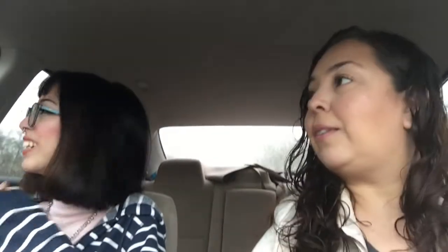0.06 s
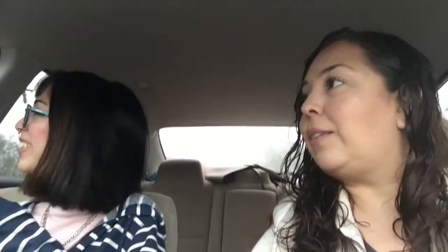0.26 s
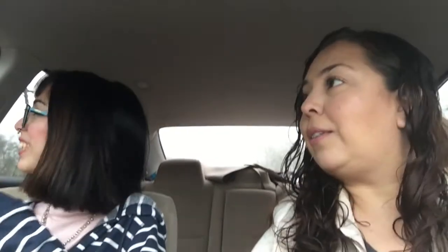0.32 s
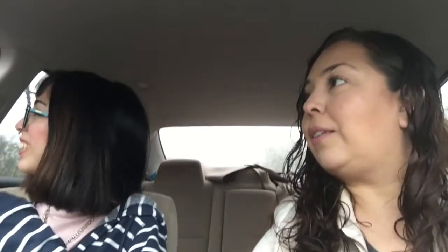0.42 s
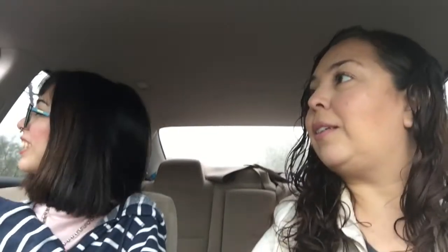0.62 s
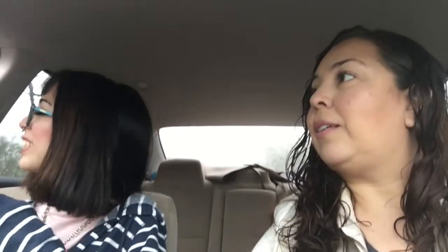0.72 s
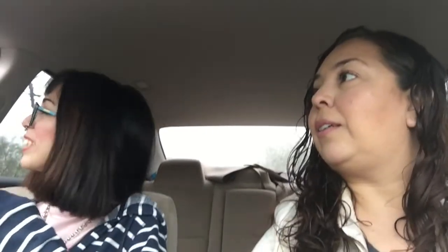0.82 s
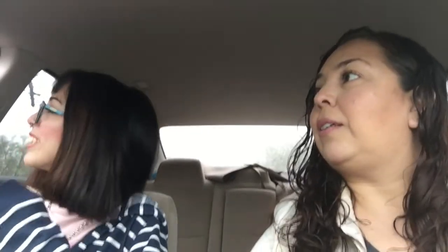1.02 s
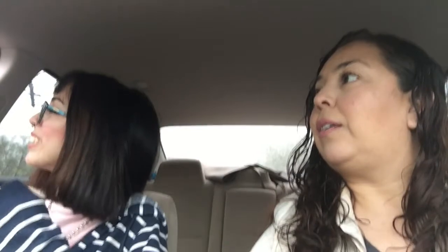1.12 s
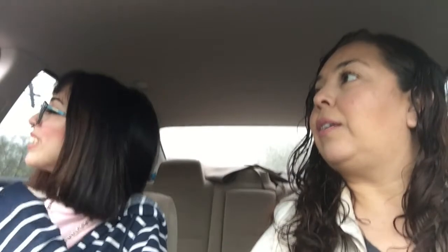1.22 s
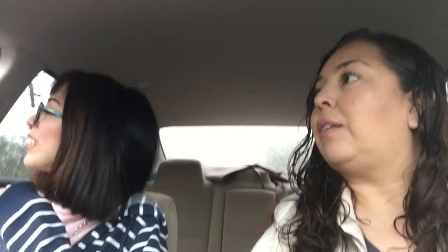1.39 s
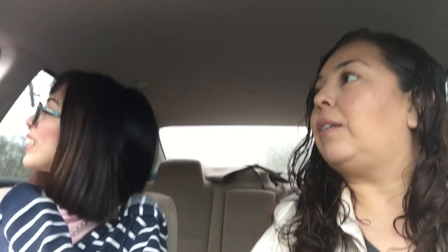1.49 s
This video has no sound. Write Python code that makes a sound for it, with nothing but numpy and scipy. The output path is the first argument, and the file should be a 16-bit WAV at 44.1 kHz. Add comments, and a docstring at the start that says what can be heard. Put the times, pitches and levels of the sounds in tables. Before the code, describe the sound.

Electric car window: after a brief quiet engine rumble, a rattly plastic clack and low thumps, then a thin motor whine with gear noise and rubbing glass, with a few later clicks; small muffled cabin, one nearby microphone.

```python
"""A parked car idles with the cabin shut: wavering firing orders, low lumps, faint injector ticks and a
noise floor. A door switch clacks, a rattle of contacts exciting trim modes, and the window motor pulls
the glass out of its seal: thuds and rough noise shudder the door panel as the rubbing hiss sets in.
Then the motor whines at ten times its rotor speed, a sum of rotor orders, over the hiss of gears
and of glass in its guides, both noise; a few later clacks follow."""
import sys
import numpy as np
from scipy import signal
from scipy.io import wavfile

SR = 44100
rng = np.random.default_rng(int(sys.argv[2]) if len(sys.argv) > 2 else 0)


def materialize(psi):
    """Save the field psi as 16-bit PCM at rate SR to the path in sys.argv[1].

    A 1-D psi becomes a single channel; in a 2-D psi each row is a channel.
    """
    bounded = np.clip(np.atleast_2d(psi).T, -1, 1)
    quanta = np.round(bounded * 32767).astype(np.int16)
    wavfile.write(sys.argv[1], SR, quanta)


def gain_from_db(level_db):
    """Turn a decibel level (scalar or array-like) into a linear amplitude factor."""
    decades = np.asarray(level_db, float) / 20
    return 10 ** decades


N = 68355
T = np.arange(N) / SR   # time [s]

# Engine firing orders: (multiple of firing rate [1], level against the hum [dB], waver [dB])
FIRING_ORDERS = [(1, 0.5, 3.6), (1.5, -15.5, 3.3), (2, -16, 1.3)]
# Swell and sag of the idle hum: (time [s], level [dB])
IDLE_LEVEL = [(0, -48.5), (.05, -56), (.13, -57), (.2, -47), (.4, -67), (.5, -51), (.7, -50.5), (.93, -54),
              (1.02, -55), (1.38, -54.5), (1.48, -51.5), (1.55, -47.5)]
# Resonances rung by the injector ticks: (frequency [Hz])
TICK_MODES = [6460, 8500, 10950, 13300]
# Spectrum of the cabin noise floor: (frequency [Hz], relative density [dB per Hz])
CABIN_SPECTRUM = [(15, -37), (25, -45), (37, -5.5), (93, -8), (126, -2.5), (140, -25), (173, -28.5),
                  (433, -23), (648, -24.5), (703, -34.5), (14300, -55.5), (15500, -69)]
# Clacks of switch, linkage and glass:
# (time [s], level [dB], rattle length [s], centre [Hz], mode loss one octave off centre [dB])
CLACKS = [(0.14, -74, 0.0074, 730, 12), (0.162, -52, 0.015, 2000, 28), (0.189, -44, 0.0024, 2180, 8),
          (0.199, -35, 0.0052, 1840, 16), (0.2302, -28, 0.0066, 3150, 7), (0.2615, -31, 0.0014, 1330, 8),
          (0.2651, -18.5, 0.0075, 2030, 2.5), (0.274, -52, 0.007, 1300, 9), (0.329, -35, 0.014, 790, 9),
          (0.629, -33.5, 0.0024, 740, 4), (0.632, -33.5, .006, 550, 1), (1.121, -35, 0.0058, 351.2, 6)]
# Modes of the door trim: (frequency [Hz])
TRIM_MODES = [335, 575, 812, 1140, 1300, 1437, 1678, 2090, 2455, 2980, 3915, 4230, 6200, 6550, 7900, 8350,
              10500]
# Ring of each trim mode: (relative level [dB], T60 [s])
TRIM_RINGS = [(-3, 0.043), (-3.5, 0.013), (-14.5, 0.051), (2, 0.044), (-1, 0.017), (-8.5, 0.016),
              (-2, 0.018), (2.5, 0.01), (-8, 0.034), (-13, 0.028), (-4.5, 0.012), (-2.5, .018),
              (-3.5, 0.017), (-8.5, 0.014), (-2.5, 0.018), (-7.5, 0.014), (-16, 0.012)]
# Low thumps, first lumps of the idle, then door panel thuds as the glass frees:
# (time [s], level [dB], centre [Hz])
THUMPS = [(0.013, -48.5, 98), (.098, -45.5, 95), (.143, -40.5, 99), (.186, -44, 88.4), (.208, -26.5, 126),
          (.232, -30.5, 166), (0.243, -31.5, 145), (0.263, -24.5, 282), (.278, -40, 79),
          (0.286, -35.5, 223), (0.317, -33, 75), (0.351, -34.5, 109), (.366, -31, 95), (.377, -30, 76),
          (0.438, -38, 96)]
# Low modes rung by the thumps: (frequency [Hz], damping rate [Hz], relative level [dB])
LOW_MODES = [(71.6, 26.7, 8), (95, 16.5, 0.5), (138.6, 28, 1), (165, 33, -2), (223, 27, -6), (356, 36, -3),
             (480, 90, -8)]
# Rough shudder of the door panel: (time [s], level [dB])
SHUDDER = [(0.17, -78), (0.202, -42.5), (0.24, -48), (0.268, -38), (0.318, -64), (0.34, -45.5),
           (0.432, -57.5), (0.456, -55.5), (0.472, -66), (0.548, -71), (0.56, -69)]
# Motor whine: (time [s], frequency [Hz], level [dB])
WHINE = [(.44, 1315, -56), (.5, 1319, -63.5), (.57, 1325, -58.5), (.62, 1310, -50.5), (.655, 1277, -69.5),
         (.69, 1249, -49), (.72, 1281, -58.5), (.755, 1240, -59.5), (.8, 1213, -55.5), (.9, 1177, -58.5),
         (1.02, 1130, -54.5), (1.04, 1100, -56), (1.12, 1098, -56), (1.2, 1092, -60.5), (1.27, 1075, -58.5),
         (1.44, 1082, -58.5), (1.55, 1110, -58.5)]
# Rotor orders beside the whine: (multiple of rotor speed [1], level against the whine [dB])
SIDE_ORDERS = [(5, -30), (7, -24.5), (8, -32), (9, -19), (11, -18.5), (12, -23), (13, -33), (19, -18),
               (20, -21), (24, -15), (30, -26)]
# Resonances of motor housing and door: (frequency [Hz], width [Hz], relative level [dB])
HOUSING_MODES = [(673.4, 20.4, -3), (909, 30, -8), (1830, 59, 1), (1950, 74, -3.5), (2146, 150, -3.5),
                 (2600, 29, -6.5), (2960, 340, -11), (3370, 82, -2), (3900, 220, -9), (6370, 400, -15.5),
                 (7830, 250, -22)]
# Glass in its guides: (time [s], hiss level [dB], brightness [dB per octave above 3.5 kHz])
GLIDE = [(.16, -114, 5), (.19, -76, -12), (.22, -42.5, -22), (.255, -56.5, 5.5), (.285, -73, 12),
         (.295, -53.5, 0), (.318, -43.5, -6.5), (.345, -51.5, 4), (.36, -53.5, 2), (.38, -49, -2),
         (.41, -54.5, -4), (.5, -52.5, 1), (.6, -55, 1), (.8, -54.5, 2.5), (1.0, -56.5, 5),
         (1.19, -55.5, 5), (1.35, -58, 3.5), (1.55, -57, 5.5)]
# Spectrum of the rubbing hiss: (frequency [Hz], relative density [dB per Hz])
HISS_SPECTRUM = [(90, -22), (130, -7), (170, -8), (350, -2.5), (480, -17), (640, -17.5), (780, -29),
                 (1000, -21.5), (1400, -9), (1750, -8.5), (2700, -8), (3400, -8.5), (5000, -17.5),
                 (6300, -16.5), (8000, -19.5), (11000, -35), (15500, -46)]


def rms_one(x):
    """Power normalisation: the root mean square becomes 1."""
    return x / np.sqrt(np.mean(x ** 2) + 1e-20)


def peak_one(x):
    """Amplitude normalisation: the greatest magnitude becomes 1."""
    return x / (np.max(np.abs(x)) + 1e-20)


def in_time(rows):
    """Linear interpolation: the columns of a table joined by straight lines in time."""
    s, *columns = np.transpose(rows)
    return [np.interp(T, s, column) for column in columns]


def drift(rate_hz):
    """Low-pass random process: two equal real poles at rate_hz leave a slow wander of spread 1."""
    step = 40   # samples between the points of the wander
    r = np.exp(-2 * np.pi * rate_hz * step / SR)
    white = rng.standard_normal(N // step + 2002)
    slow = signal.lfilter([1], [1, -2 * r, r * r], white)[2000:]   # settled part
    return np.interp(np.arange(N) / step, np.arange(len(slow)), rms_one(slow - slow.mean()))


def resonate(x, hz, width_hz):
    """Driven resonance: a pole pair passes a band around hz with gain 1 on top."""
    r = np.exp(-np.pi * width_hz / SR)
    poles = [1, -2 * r * np.cos(2 * np.pi * hz / SR), r * r]
    return signal.lfilter([(1 - r * r) / 2, 0, (r * r - 1) / 2], poles, x)


def ring(clicks, hz, t60):
    """Free decay: each unit click starts a damped sine whose envelope begins at 1."""
    r = 10 ** (-3 / (t60 * SR))
    w = 2 * np.pi * hz / SR
    return signal.lfilter([0, np.sin(w)], [1, -2 * r * np.cos(w), r * r], clicks + 1e-18)


def banded_noise(spectrum, patchy_db, bright_db=0, air_db=0):
    """Subtractive synthesis: flickering third-octave noise bands, rms 1 before brightness and air."""
    edges = 24 * 2 ** np.arange(0, 9.5, 1 / 3)   # [Hz]
    white = rng.standard_normal((2, N + 8000))
    hz_points, db_points = np.transpose(spectrum)
    out, power = 0, 0
    for k, (low, high) in enumerate(zip(edges, edges[1:])):
        band_pass = signal.butter(3, [low, high], "band", fs=SR, output="sos")
        band = signal.sosfilt(band_pass, white[k % 2])[8000:]
        hz = np.sqrt(low * high)
        level_db = np.interp(np.log(hz), np.log(hz_points), db_points)
        flicker_db = patchy_db * (1 + 1.2 * (hz < 600)) * drift(10.8)   # deeper in the bass
        band = band * gain_from_db(level_db + flicker_db)
        power = power + np.mean(band ** 2)
        tilt_db = bright_db * np.clip(np.log2(hz / 3500), 0, 1.5)
        out = out + band * gain_from_db(tilt_db + air_db * (hz > 9500))
    return out / np.sqrt(power)


def cabin(x, wet_db):
    """Reverberation: reflections in the upholstered cabin act as exponentially decaying noise."""
    t60 = 0.12   # [s]
    age = np.arange(int(.15 * SR)) / SR
    tail = rng.standard_normal(len(age)) * 10 ** (-3 * age / t60) * (age > .003)
    tail = tail / np.sqrt(np.sum(tail ** 2))
    return x + gain_from_db(wet_db) * signal.fftconvolve(x, tail)[:N]


def cabin_floor():
    """Stationary noise: the cabin floor is shaped by its spectral density."""
    return gain_from_db(-58) * banded_noise(CABIN_SPECTRUM, patchy_db=1.0)


def engine_hum(firing_hz):
    """Periodic excitation: wavering sines at multiples of a slightly wandering firing rate."""
    phase = 2 * np.pi * np.cumsum(firing_hz + 1.37 * drift(3.9)) / SR
    orders = 0
    for k, db, waver_db in FIRING_ORDERS:
        level = gain_from_db(db + waver_db * drift(15))
        orders = orders + level * np.sqrt(2) * np.sin(k * phase + rng.uniform(0, 7.2))
    hum_db, = in_time(IDLE_LEVEL)
    return gain_from_db(hum_db) * orders


def injector_ticks(firing_hz):
    """Impulse response: a click once per two nominal firing periods rings high resonances."""
    clicks = np.zeros(N)
    s = np.arange(.0425, T[-1], 2 / firing_hz)
    clicks[(s * SR).astype(int)] = gain_from_db(-75.5)
    return sum(ring(clicks, hz, t60=0.017) for hz in TICK_MODES)


def engine():
    """Superposition: firing hum plus injector ticks, both tied to one nominal rate."""
    firing_hz = 45.94
    return engine_hum(firing_hz) + injector_ticks(firing_hz)


def contact_rattle(length):
    """Random point process: contacts of either sign die away under a Gaussian; energy is 1."""
    contacts_per_s = 2500
    draw = rng.random((3, 2000))
    age = np.arange(2000) / SR
    hits = (draw[0] < contacts_per_s / SR) * np.sign(draw[1] - .5) * (0.13 + draw[2])
    hits[0] = .5   # there is always a first contact
    hits = hits * np.exp(-(age / length) ** 2)
    return np.concatenate([hits / np.sqrt(np.sum(hits ** 2)), np.zeros(SR // 10)])


def clacks():
    """Impact excitation: each rattle of contacts gives a broad snap and rings the trim's modes."""
    out = np.zeros(N)
    for s, db, length, centre_hz, focus_db in CLACKS:
        force = contact_rattle(length)
        modes = 0
        for hz, (mode_db, t60) in zip(TRIM_MODES, TRIM_RINGS):
            loss_db = focus_db * np.log2(hz / centre_hz) ** 2
            modes = modes + gain_from_db(mode_db - loss_db) * peak_one(ring(force, hz, t60))
        focus = max(focus_db, 1)
        snap = force
        for _ in range(3):
            snap = resonate(snap, centre_hz, centre_hz * 4.3 / focus)
        sound = gain_from_db(db) * (gain_from_db(-8) * modes + gain_from_db(13.5) * snap)
        # a more sharply focused contact is also duller
        cut_hz = np.clip(centre_hz * 14.4 / focus, 0.75 * centre_hz, 11000)
        sound = signal.sosfilt(signal.butter(2, cut_hz, fs=SR, output="sos"), sound)
        i = int(s * SR)
        out[i:i + len(sound)] += sound[:N - i]
    return out


def low_thumps():
    """Modal excitation: each idle lump or panel thud rings mostly the low modes near its centre."""
    out = np.zeros(N)
    s, thump_db, centre_hz = np.transpose(THUMPS)
    signs = rng.choice([-1, 1], len(s))
    for hz, damping_hz, mode_db in LOW_MODES:
        loss_db = 11.5 * np.log2(hz / centre_hz) ** 2   # 11.5 dB one octave off
        blows = np.zeros(N)
        blows[(s * SR).astype(int)] = signs * gain_from_db(thump_db + mode_db - loss_db)
        # the second, broad resonance softens the onset
        out = out + resonate(ring(blows, hz, 1.51 / damping_hz), hz, hz * 0.57)
    return out


def panel_shudder():
    """Band-limited noise: a rough shudder of the door panel, shaped in level, fills between thuds."""
    db, = in_time(SHUDDER)
    fade_in = np.clip((T - SHUDDER[0][0]) / 0.013, 0, 1)
    fade_out = np.clip((SHUDDER[-1][0] - T) / 0.028, 0, 1)
    band_pass = signal.butter(2, [170, 520], "band", fs=SR, output="sos")
    rough = rms_one(signal.sosfilt(band_pass, rng.standard_normal(N)))
    return gain_from_db(db) * fade_in * fade_out * rough


def motor_tones(rotor_hz, turns, whine_db):
    """Order synthesis: commutator whine, side orders and rotor hum are locked to the rotor angle."""
    whine = gain_from_db(whine_db + drift(38)) * np.sin(2 * np.pi * 10 * turns)   # wavers by 1 dB
    side = 0
    for k, db in SIDE_ORDERS:
        side = side + gain_from_db(db + 5.9 * drift(27)) * np.sin(2 * np.pi * (k * turns + rng.random()))
    # the cabin booms near 108.7 Hz and loses 66 dB one octave off
    boom_db = -59 - 66 * abs(np.log2(rotor_hz / 108.7))
    rotor = gain_from_db(boom_db + 4.0 * drift(2.2)) * np.sin(2 * np.pi * turns)
    return np.sqrt(2) * (whine + gain_from_db(whine_db) * side + rotor)


def gear_noise(turns, running):
    """Source and filter: a knock each turn and rough noise drive the housing's resonances."""
    rough = 0.57   # share of noise against knocks
    knocks = rms_one(np.diff(np.floor(turns), prepend=0)) * running
    force = (1 - rough) * knocks + rough * rng.standard_normal(N)
    out = 0
    for k, (hz, width_hz, db) in enumerate(HOUSING_MODES):
        out = out + gain_from_db(db + 2.3 * drift(8.2)) * (-1) ** k * resonate(force, hz, width_hz)
    return rms_one(out)


def glass_hiss(bright_db):
    """Friction noise: rubbing glass hisses, its top brightest as the glass leaves the seal."""
    since_seal = T - 0.32
    air_db = 12.5 * np.exp(-np.maximum(since_seal, 0) / 0.48) * (since_seal > 0)
    return banded_noise(HISS_SPECTRUM, patchy_db=2.1, bright_db=bright_db, air_db=air_db)


def motor_and_glass():
    """Common drive: one rotor angle paces tones and gears; gears share the level of the rubbing."""
    whine_hz, whine_db = in_time(WHINE)
    hiss_db, bright_db = in_time(GLIDE)
    turns = np.cumsum(whine_hz + 7.5 * drift(49)) / SR / 10   # whine jitters by 7.5 Hz
    running = np.clip((T - WHINE[0][0]) / 0.077, 0, 1)
    tones = running * motor_tones(whine_hz / 10, turns, whine_db)
    rubbing = glass_hiss(bright_db) + gain_from_db(-3) * gear_noise(turns, running)
    return tones + gain_from_db(hiss_db) * cabin(rubbing, wet_db=-8) * (T > GLIDE[0][0])


def scene():
    """Superposition: the pressures of all sources add at one microphone."""
    background = cabin_floor() + engine()
    knocks = cabin(clacks(), wet_db=-13) + low_thumps() + panel_shudder()
    return (background + knocks + motor_and_glass())[None]


def roll_off(x):
    """The treble ends steeply here."""
    return signal.sosfilt(signal.butter(12, 15690, fs=SR, output="sos"), x)


def record(dry):
    """High-pass filtering: the microphone cuts the deepest bass, below 30 Hz."""
    mix = signal.sosfilt(signal.butter(2, 30, "high", fs=SR, output="sos"), dry)
    return roll_off(mix)


dry = scene()
out = record(dry)
materialize(out)
```